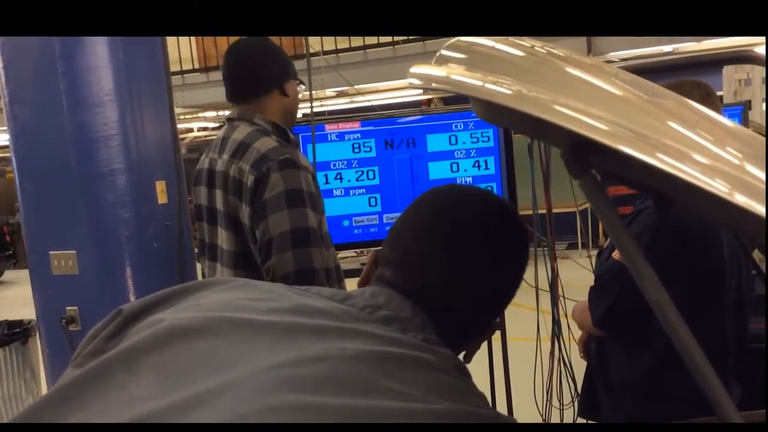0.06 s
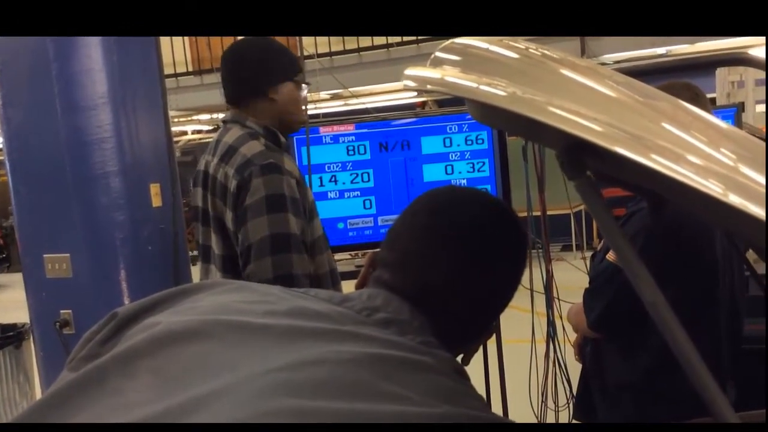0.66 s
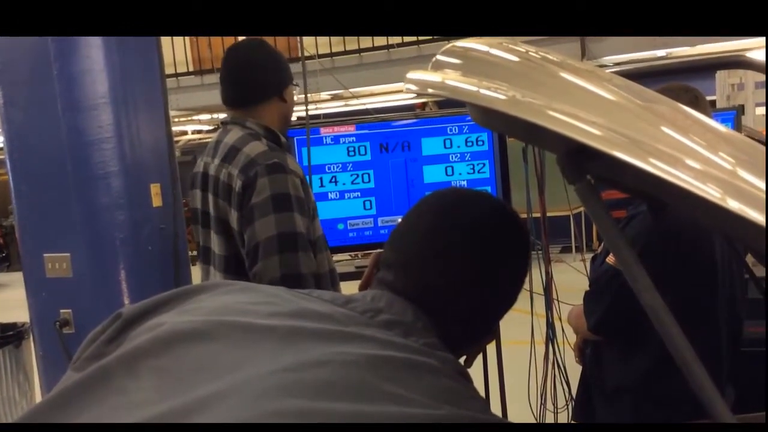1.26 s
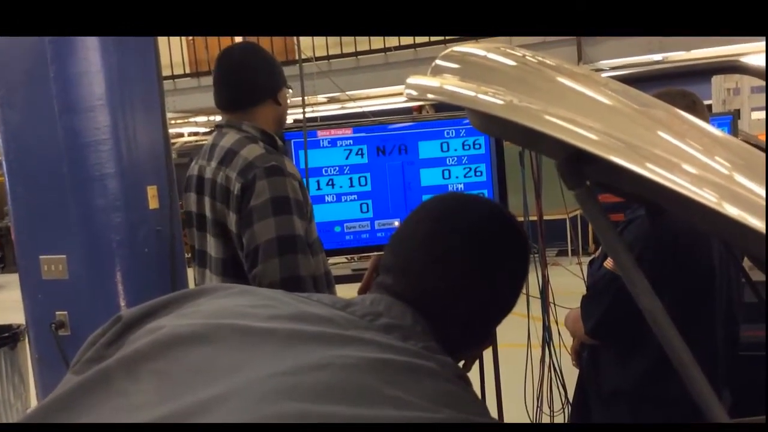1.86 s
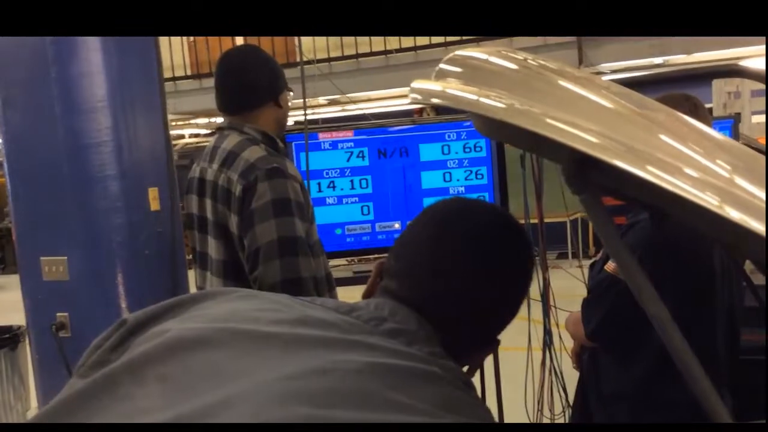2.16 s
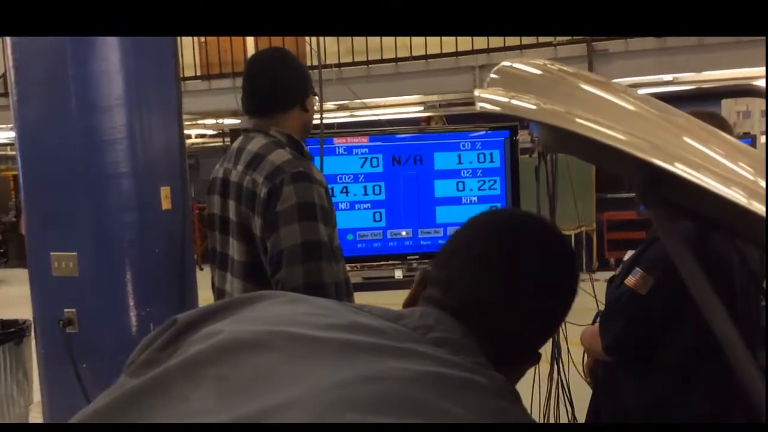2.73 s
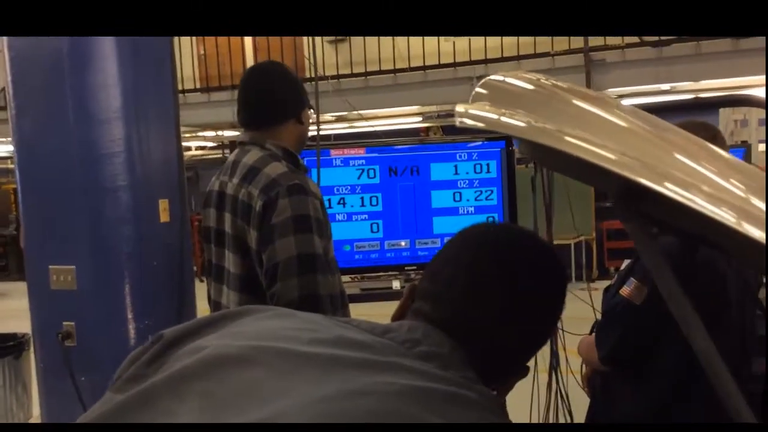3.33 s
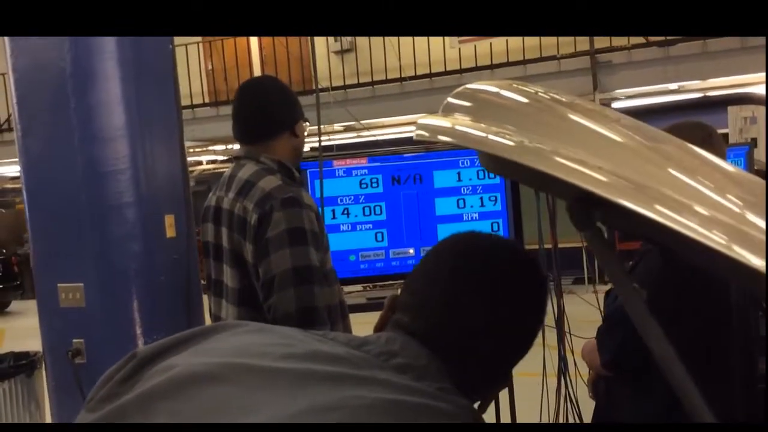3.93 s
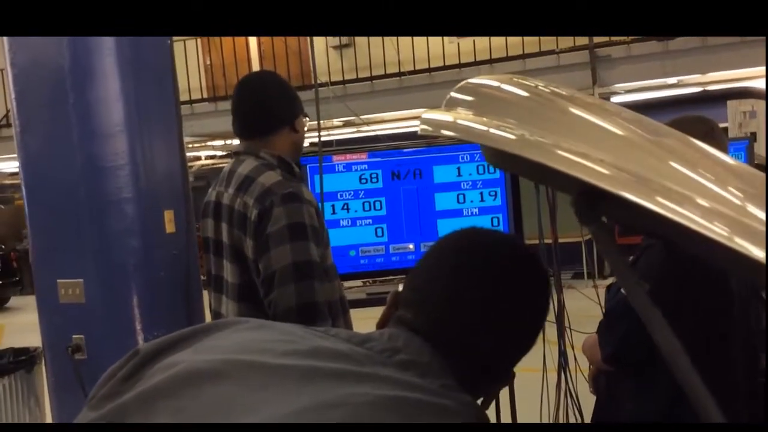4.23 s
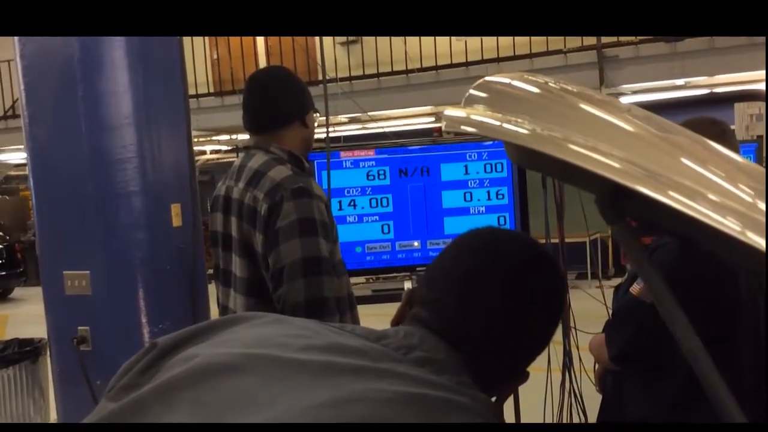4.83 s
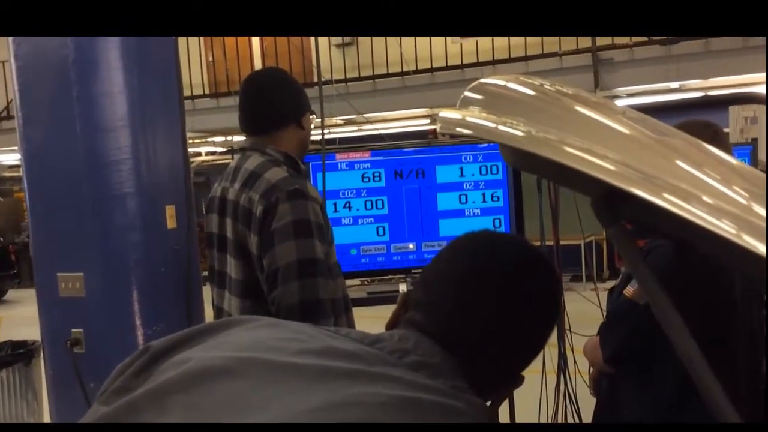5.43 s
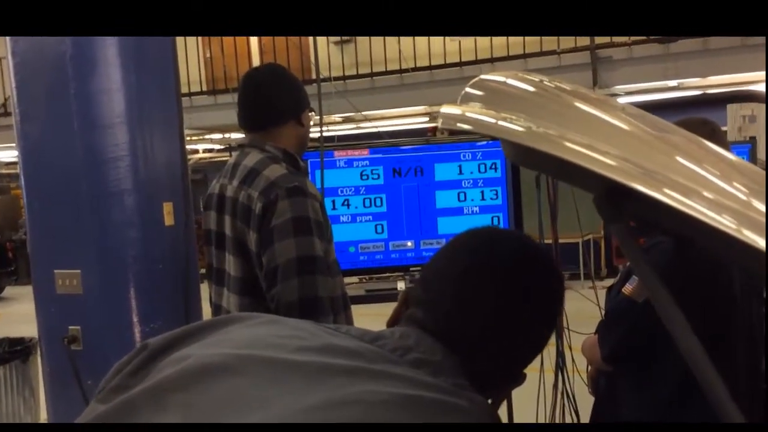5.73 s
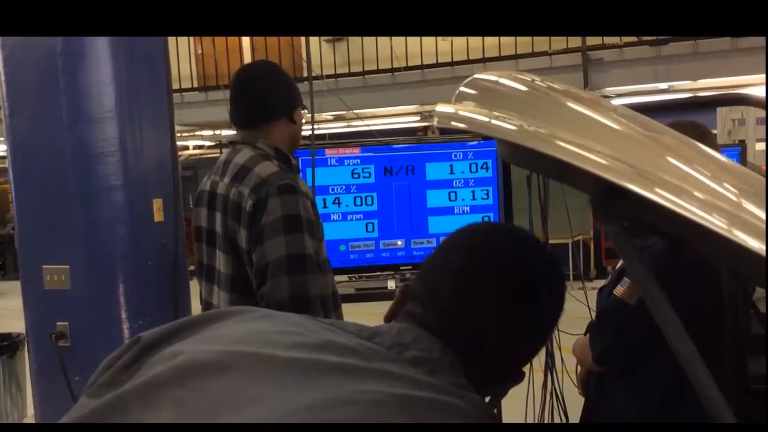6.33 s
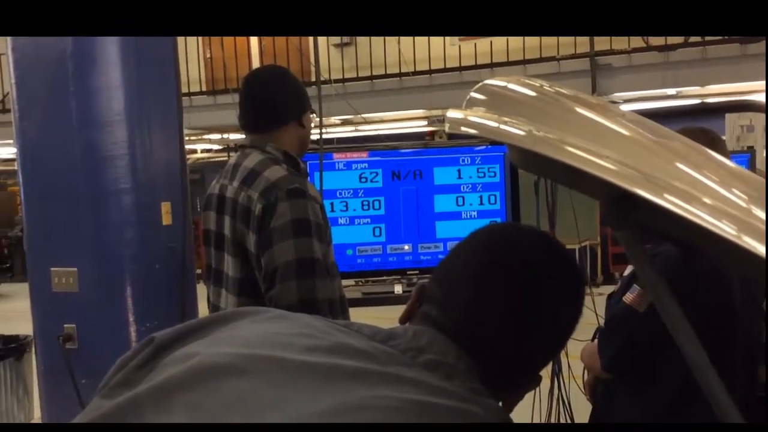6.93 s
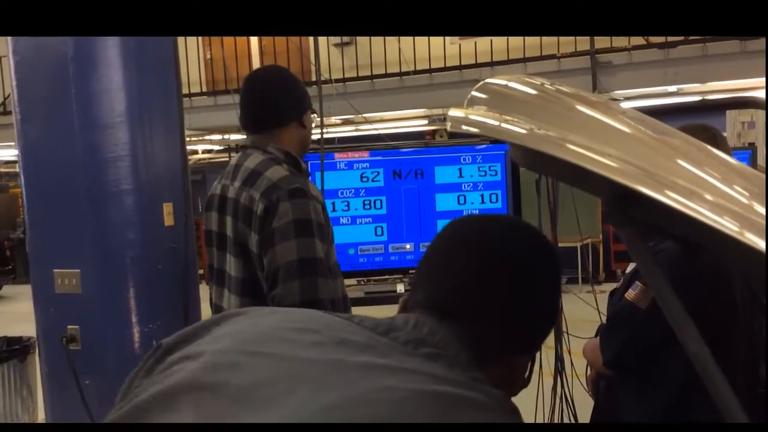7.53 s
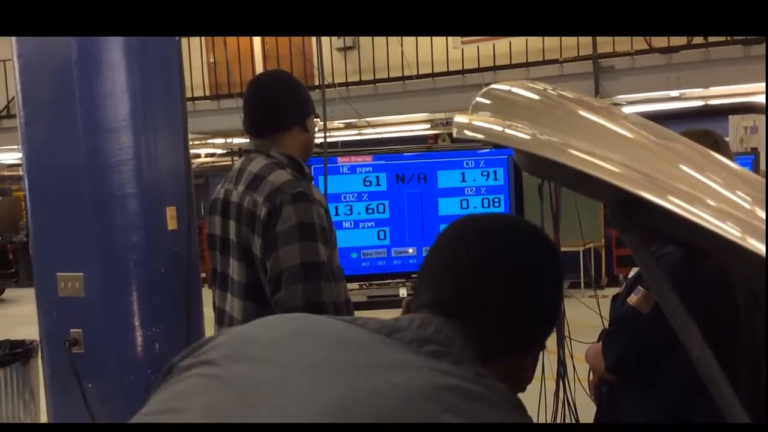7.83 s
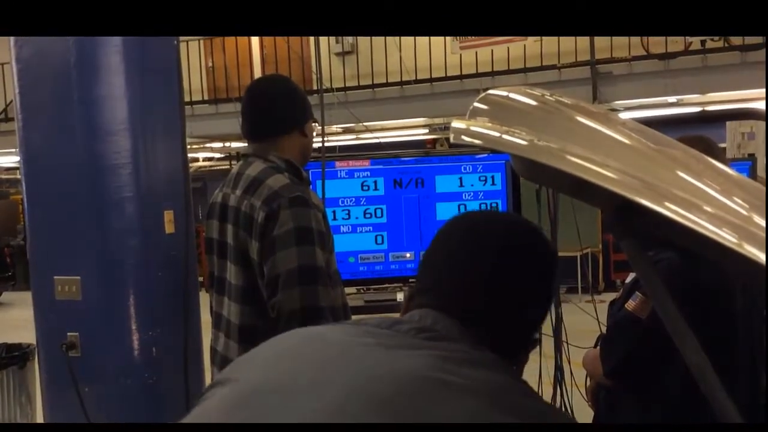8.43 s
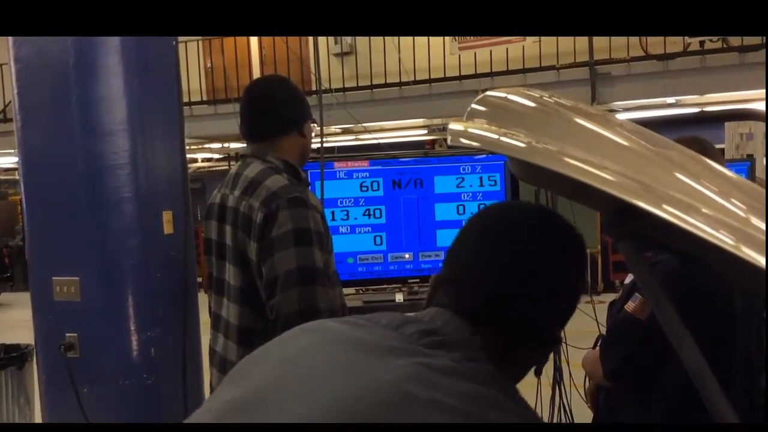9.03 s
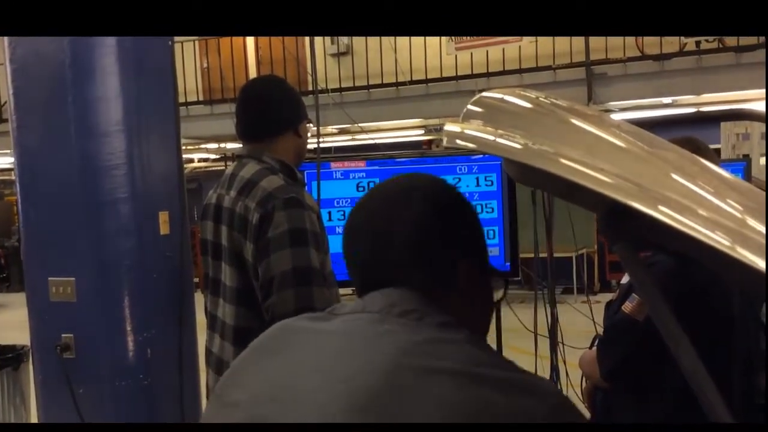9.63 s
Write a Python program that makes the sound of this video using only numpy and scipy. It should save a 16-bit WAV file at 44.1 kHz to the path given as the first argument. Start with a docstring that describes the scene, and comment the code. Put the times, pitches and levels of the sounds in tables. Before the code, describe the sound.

A loud, steady hiss of air rushes over a car engine idling fast and unevenly in a workshop bay. Heard from beside the open bonnet, the engine hums and whines, with rapid valve ticks and the chatter of loose metal parts. A few brief scuffs and soft bumps come from close by over a low room rumble. After about seven seconds the idle sags and the clatter softens.

```python
"""A loud, fluttering rush of air comes first, over a car engine idling fast and unevenly in a workshop.
Under the open bonnet the crankshaft sets every rhythm: its orders give the firing hum and drive whine,
and each turn brings spurts of air, valve ticks and knocks that excite the resonances of metal parts.
Loose parts chatter, the room rumbles, and a few scuffs and soft bumps come from close by.
After about seven seconds the idle sags, and the clatter softens with it."""
import sys
import numpy as np
from scipy import signal
from scipy.fft import rfft, irfft, next_fast_len
from scipy.io import wavfile

SR = 44100
rng = np.random.default_rng(int(sys.argv[2]) if len(sys.argv) > 2 else 0)


def wav_out(sig):
    """Save sig, one row per channel (or a flat mono array), as 16-bit PCM at SR to the path in sys.argv[1]."""
    wavfile.write(sys.argv[1], SR, np.round(np.clip(np.atleast_2d(sig).T, -1, 1) * 32767).astype(np.int16))


N = 426447
TIME = np.arange(N) / SR
SLOW_HZ, MIDDLE_HZ, FAST_HZ = 19.8, 20.8, 21.3  # crank turns a second at slow, middle and fast idle


def amp(db):
    """Amplitude ratio: tenfold for every 20 dB."""
    return 10 ** (np.asarray(db) / 20)


def unit(x):
    """Normalisation to an rms of 1."""
    return x / np.sqrt(np.mean(x ** 2) + 1e-20)


def bell(offset, sigma):
    """Gaussian window with a peak of 1 and standard deviation sigma."""
    return np.exp(-.5 * (offset / sigma) ** 2)


def coloured(x, gain):
    """Linear filtering: the spectrum is multiplied by gain(frequency), then scaled to rms 1."""
    size = next_fast_len(len(x), True)
    shaped = rfft(x, size) * gain(np.fft.rfftfreq(size, 1 / SR))
    return unit(irfft(shaped, size)[:len(x)])


def spectrum(points):
    """Frequency response through (frequency [Hz], level [dB]) points on a logarithmic axis."""
    hz, db = np.transpose(points)
    return lambda f: amp(np.interp(np.log(f + 1), np.log(hz + 1), db))


def band_noise(hz, half_width, count=N):
    """Resonance under random forcing: noise gathers around one frequency."""
    return coloured(rng.standard_normal(count), lambda f: 1 / (1 + ((f - hz) / half_width) ** 2))


def drift(rate_hz):
    """Random modulation: low-pass noise of rms 1."""
    return coloured(rng.standard_normal(N), lambda f: np.exp(-(f / rate_hz) ** 2))


def ping(hz, width):
    """Damped oscillation: a struck mode swells, then dies, the faster the wider its resonance."""
    t = np.arange(SR // 10) / SR
    return np.sqrt(t) * np.exp(-np.pi * width * t) * np.sin(2 * np.pi * hz * t)


def at_speed(speed, levels):
    """Linear interpolation between the levels at slow, middle and fast idle."""
    return np.interp(speed, [SLOW_HZ, MIDDLE_HZ, FAST_HZ], levels)


# course of the idle: (time [s], crank speed [turns/s])
IDLE_SPEED = [(0.0, 20.65), (0.63, 20.94), (1.46, 21.06), (2.81, 21.43), (3.45, 21.51), (3.82, 21.38),
              (5.01, 21.42), (5.54, 21.2), (6.56, 21.48), (7.07, 21.26), (8.84, 19.74), (9.11, 19.82),
              (9.67, 19.47)]


def crank(stumble=.001, stumble_hz=6):
    """Angle in turns is the integral of speed; weak firings make the rotation stumble."""
    speed = np.interp(TIME, *np.transpose(IDLE_SPEED))
    turns = np.cumsum(speed * (1 + stumble * drift(stumble_hz))) / SR
    return speed, turns


# spectrum of the air stream: (frequency [Hz], relative density [dB])
AIR_SPECTRUM = [(530, -33), (900, -13), (1170, -10), (1270, -6), (1530, -5), (1930, -2), (2250, -4.5),
                (3250, -2.5), (3720, 0), (4130, -3), (5420, 0.5), (7180, -6.5), (9030, -3.5), (10300, -7.5),
                (10900, -12), (14200, -61), (22000, -120)]


def rush(air_db=-20.5, flutter_db=.44, flutter_hz=25):
    """Turbulence: fan and intake air radiate broadband noise whose level flutters slightly."""
    stream = coloured(rng.standard_normal(N), spectrum(AIR_SPECTRUM))
    return stream * amp(air_db + flutter_db * drift(flutter_hz))


# spurts in one turn: (angle [turns], sigma [turns], relative level [dB], centre [Hz], half width [Hz])
AIR_SPURTS = [(0.671, 0.042, -33, 3860, 2050), (.2, 0.066, -38, 2900, 1600),
              (0.33, 0.19, -33.5, 7600, 6400)]


def spurts(turns, uneven=.34, uneven_hz=49):
    """Amplitude modulation: air hisses harder at fixed crank angles, never twice the same."""
    out = np.zeros(N)
    for angle, sigma, db, hz, half_width in AIR_SPURTS:
        offset = (turns - angle + .5) % 1 - .5
        gate = bell(offset, sigma) * (1 + uneven * drift(uneven_hz))
        out += amp(db) * unit(gate * band_noise(hz, half_width))
    return out


# firing hum, then the whine of belt-driven parts that slip a little:
# (multiple of crank speed [1], level at slow idle [dB], at middle idle [dB], at fast idle [dB])
ENGINE_ORDERS = [(3, -48, -61, -58), (4, -54, -54, -45.5), (5.98, -39.5, -38.5, -44),
                 (7.93, -59, -56, -52.5), (9.03, -45.5, -46, -51), (9.99, -46, -45, -40.5),
                 (11.99, -36.5, -36, -43.5), (14.02, -52, -48, -42), (14.92, -66, -43.5, -48),
                 (16, -51, -52, -50), (22, -57, -61, -49.5), (23.97, -51, -51, -42.5),
                 (29.96, -57, -57, -58), (36.1, -56, -54, -56), (71.45, -56, -44, -36),
                 (95.87, -50, -56, -38.5), (108.2, -37, -44, -35)]
# standing waves of the workshop: (frequency [Hz], sigma [Hz], gain [dB])
ROOM_MODES = [(186, 1.3, 7), (189.7, 1, -13), (191, 0.94, 14), (239, 0.72, -6), (253.3, 1.2, -9)]


def hum(speed, turns, waver=.16, waver_hz=4):
    """Rotational orders: tones follow the crank, lifted or cancelled as they cross standing waves."""
    out = np.zeros(N)
    for multiple, *levels in ENGINE_ORDERS:
        tone = np.sqrt(2) * np.cos(2 * np.pi * (multiple * turns + rng.random()))
        room_db = sum(db * bell(multiple * speed - hz, sigma) for hz, sigma, db in ROOM_MODES)
        out += amp(at_speed(speed, levels) + room_db) * tone * (1 + waver * drift(waver_hz))
    return out


# valve and injector ticks in one turn: (angle [turns], relative level [dB])
VALVE_TICKS = [(.09, -2.5), (.2, -5), (.29, -2), (.4, -6), (.53, -3), (.66, -2), (.85, -4), (.97, -6.5)]
# response of the struck metal: (frequency [Hz], relative gain [dB])
METAL_RESPONSE = [(250, -10.5), (500, -13), (650, -7.5), (1200, -8.5), (1550, 2.5), (2400, 3), (3200, 0),
                  (5300, -8), (7000, -4.5), (11000, -10)]


def valve_train(turns, ring_t60=.097, bay_t60=.16, bay_db=-11, scatter_db=2.5, jitter_s=2e-5):
    """Impact excitation: each tick rings its own dense metal modes, nearly alike from turn to turn."""
    t, out = np.arange(SR // 5) / SR, np.zeros(N)
    decay = amp(-60 * t / ring_t60) + amp(bay_db - 60 * t / bay_t60)
    each_turn = np.arange(int(turns[-1]) + 1)
    for angle, db in VALVE_TICKS:
        late, force = rng.standard_normal((2, len(each_turn)))
        onset_s = np.interp(each_turn + angle, turns, TIME) + jitter_s * late
        onsets = np.clip(onset_s * SR, 0, N - 2)
        shared_modes = rng.standard_normal(len(t))
        for valve in (0, 1):  # the camshaft turns once in two crank turns, so two valves alternate
            at, size = onsets[valve::2], amp(db + scatter_db * force[valve::2])
            # each blow is split between two neighbouring samples
            blows = np.bincount(at.astype(int), size * (1 - at % 1), N)
            blows += np.bincount(at.astype(int) + 1, size * (at % 1), N)
            own_modes = .39 * rng.standard_normal(len(t))
            out += signal.oaconvolve(blows, decay * (shared_modes + own_modes))[:N]
    return coloured(out, spectrum(METAL_RESPONSE))


# pitch range of loose small parts: (frequency [Hz], relative level [dB])
CHATTER_SPECTRUM = [(1300, -8.5), (1600, -2), (2400, 0), (3800, 0.5), (5400, -0.5), (7000, -6),
                    (10500, -8.5)]


def chatter(chatter_db=-27.5, per_s=260, width_hz=55, scatter_db=4):
    """Shot noise: loose small parts ring briefly at random moments, each at its own pitch."""
    out = np.zeros(N + SR)
    lowest, highest = CHATTER_SPECTRUM[0][0], CHATTER_SPECTRUM[-1][0]
    gain = spectrum(CHATTER_SPECTRUM)
    for when, pitch, force in rng.random((int(per_s * N / SR), 3)):
        hz = lowest * (highest / lowest) ** pitch
        clink = gain(hz) * amp(scatter_db * force) * ping(hz, width_hz)
        out[int(when * N):][:len(clink)] += clink
    return amp(chatter_db) * unit(out[:N])


# resonances of covers and brackets: (frequency [Hz], width [Hz], angle of knock [turns],
# level blown by air [dB], level struck at slow idle [dB], at middle idle [dB], at fast idle [dB])
COVER_MODES = [(1357, 100, 0.0394, -45.5, -46, -52, -46), (2256, 79, .24, -39, -37, -48, -39),
               (2454, 49, .36, -39, -47, -48, -45), (2828, 50, .24, -42, -37.5, -39, -43),
               (3790, 84, .63, -39, -44, -40, -34), (4560, 310, .51, -33.5, -51, -44, -46),
               (5270, 250, .66, -35.5, -32.5, -39, -40)]


def covers(speed, turns, scatter_db=1.8, slack_turns=.009, wander_db=1.15, wander_hz=1.1):
    """Forced resonance: air and one knock a turn drive each part; each rattles most at its own speed."""
    out, each_turn = np.zeros(N), np.arange(int(turns[-1]) + 1)
    for hz, width, angle, blown_db, *struck_db in COVER_MODES:
        late, force = rng.standard_normal((2, len(each_turn)))
        onsets = np.interp(each_turn + angle + slack_turns * late, turns, np.arange(N)).astype(int)
        blows = np.bincount(onsets, amp(scatter_db * np.minimum(force, 1)), N)
        ring = unit(signal.oaconvolve(blows, ping(hz, width))[:N])
        struck = amp(at_speed(speed, struck_db)) * ring
        blown = amp(blown_db) * band_noise(hz, width)
        out += (struck + blown) * amp(wander_db * drift(wander_hz))
    return out


# rumble filling the bay: (frequency [Hz], relative density [dB])
RUMBLE_SPECTRUM = [(4, -12), (12, -13), (50, -3.5), (110, 4), (170, 0.5), (245, -0.5), (320, 0.5),
                   (400, -3), (560, -3), (900, -14), (1200, -28), (2000, -80)]


def workshop(rumble_db=-35, mains_db=-44, mains_hz=60, shudder_db=-45, shudder_hz=28):
    """Background noise: a broad low rumble, a pure mains tone and a narrow-band shudder."""
    rumble = coloured(rng.standard_normal(N), spectrum(RUMBLE_SPECTRUM))
    mains = np.sqrt(2) * np.sin(2 * np.pi * mains_hz * TIME)
    shudder = band_noise(shudder_hz, half_width=2.7)
    return amp(rumble_db) * rumble + amp(mains_db) * mains + amp(shudder_db) * shudder


def reflections(x, count=12, share=.05, nearest_s=.003, farthest_s=.016, sway_s=1.5e-4):
    """Comb filtering: echoes off bonnet, floor and bodies shift as the listening point sways."""
    out = x.copy()
    for delay in np.geomspace(nearest_s, farthest_s, count) * rng.uniform(.9, 1.1, count):
        sway_hz = rng.uniform(.036, .201)
        lag = delay + sway_s * np.sin(2 * np.pi * (TIME * sway_hz + rng.random()))
        out += share * np.interp(TIME - lag, TIME, x)
    return out / np.sqrt(1 + count * share ** 2)


# scuffs and rattles: (time [s], level [dB], centre [Hz], half width [Hz], sigma [s])
NEAR_SCUFFS = [(0.343, -19.5, 2430, 800, 0.01), (1.868, -23, 3000, 3000, 0.027), (1.88, -48, 650, 500, .03),
               (2.487, -28, 2500, 1500, 0.017), (3.086, -27, 3000, 2500, .01),
               (4.93, -23, 3600, 3000, 0.006), (7.684, -23, 2880, 200, .007),
               (8.038, -25, 2860, 100, 0.011), (8.08, -23, 2880, 70, 0.0073),
               (8.817, -21.5, 2500, 1400, .007), (9.534, -21, 2100, 400, .006),
               (9.548, -38, 700, 600, 0.04)]


def scuffs():
    """Noise transients: a brief envelope on a band of noise is heard as a scuff."""
    out = np.zeros(N)
    for when, db, hz, half_width, sigma in NEAR_SCUFFS:
        grit = np.resize(band_noise(hz, half_width, count=16384), N)
        out += amp(db) * bell(TIME - when, sigma) * grit
    return out


# soft bumps: (time [s], peak level [dB], frequency [Hz], sigma [s])
NEAR_BUMPS = [(1.84, -25, 104, .018), (2.52, -27, 26.6, 0.084), (3.73, -30, 24, 0.034),
              (4.05, -29, 28, .05), (6.36, -34, 23, .04), (8.84, -37, 150, .03), (8.96, -30, 110, 0.025),
              (9.2, -33, 121, 0.021)]


def bumps():
    """Wave packets: a few cycles of a low tone are heard as a dull bump."""
    return sum(amp(db) * bell(TIME - when, sigma) * np.cos(2 * np.pi * hz * (TIME - when))
               for when, db, hz, sigma in NEAR_BUMPS)


def scene(valve_db=-25.5, clatter_db_per_hz=1, air_db_per_hz=.05, swell_at_s=2.16):
    """Superposition at one point beside the bonnet; clatter and air grow with the crank speed."""
    speed, turns = crank()
    excess_hz = speed - FAST_HZ
    uneven_db = .5 * drift(rate_hz=1.3)
    swell_db = 1.05 * bell(TIME - swell_at_s, sigma=.45)  # the air swells once
    clatter = amp(valve_db) * valve_train(turns) + chatter()
    clatter *= amp(clatter_db_per_hz * excess_hz + uneven_db)
    ringing = covers(speed, turns)
    air = amp(air_db_per_hz * excess_hz + swell_db) * (rush() + spurts(turns))
    mono = hum(speed, turns) + reflections(clatter + ringing + air) + workshop() + scuffs() + bumps()
    return np.array([mono, mono])


def record(dry, cutoff_hz=10950):
    """Band limiting: a steep low-pass filter removes the highest treble."""
    lowpass = signal.firwin(1023, cutoff_hz, window=("kaiser", 9), fs=SR)
    return signal.oaconvolve(dry, lowpass[None], "same")


dry = scene()
out = record(dry)
wav_out(out)
```